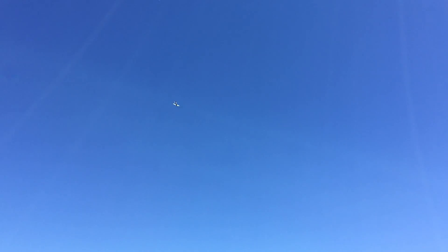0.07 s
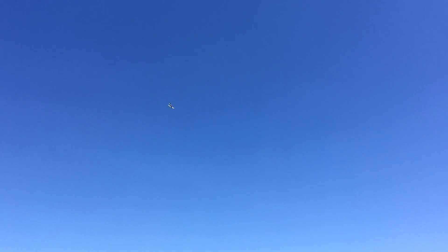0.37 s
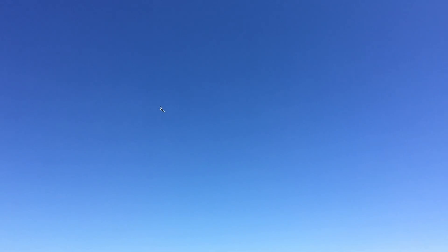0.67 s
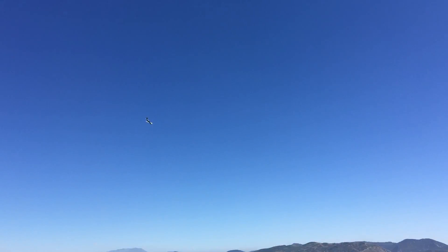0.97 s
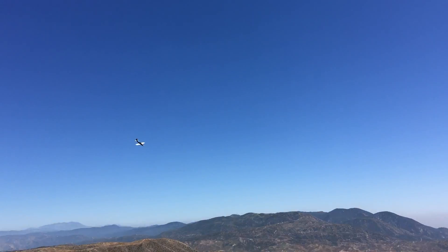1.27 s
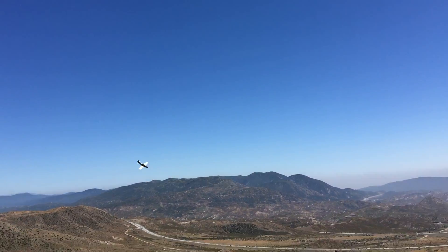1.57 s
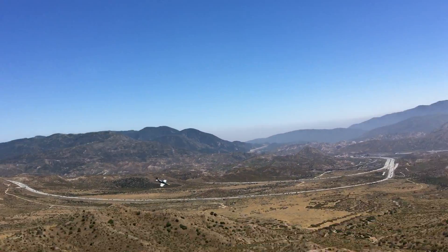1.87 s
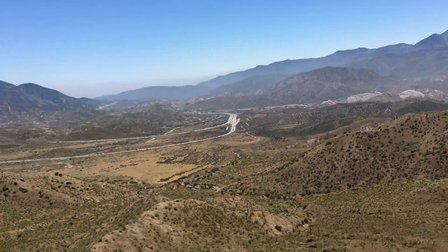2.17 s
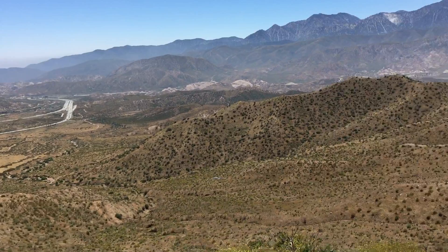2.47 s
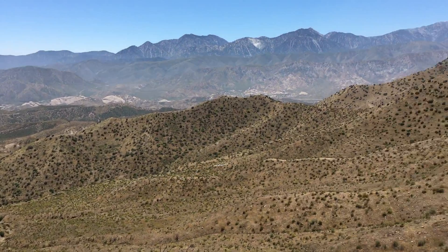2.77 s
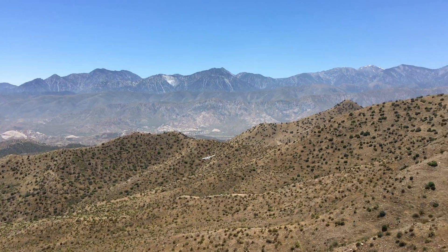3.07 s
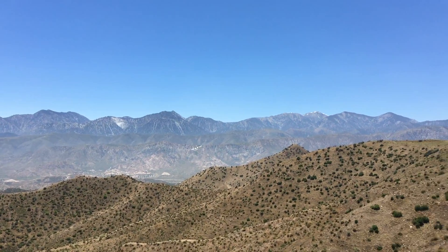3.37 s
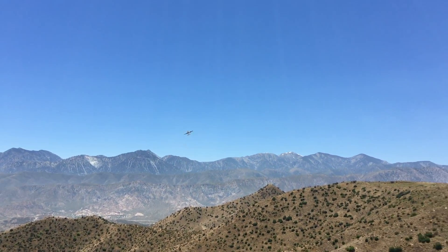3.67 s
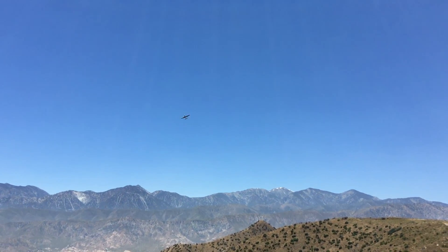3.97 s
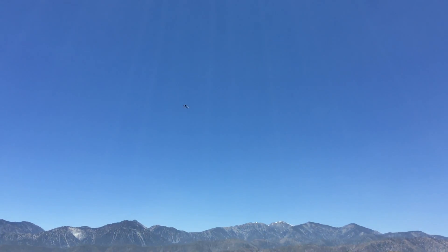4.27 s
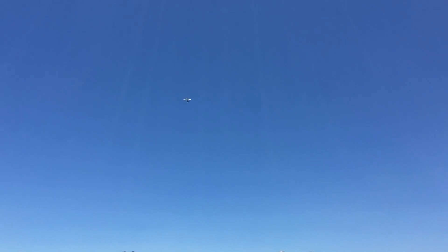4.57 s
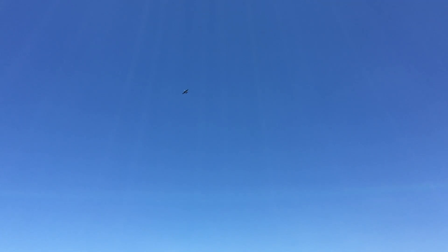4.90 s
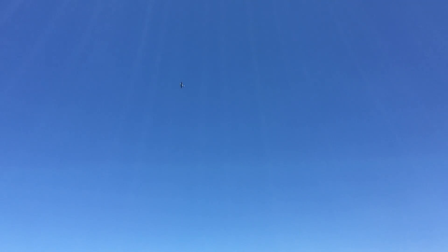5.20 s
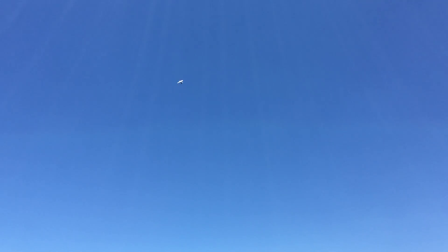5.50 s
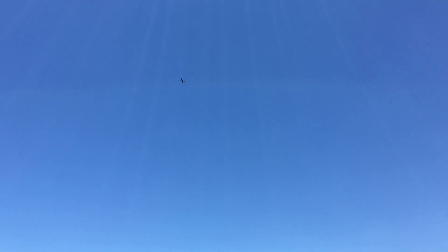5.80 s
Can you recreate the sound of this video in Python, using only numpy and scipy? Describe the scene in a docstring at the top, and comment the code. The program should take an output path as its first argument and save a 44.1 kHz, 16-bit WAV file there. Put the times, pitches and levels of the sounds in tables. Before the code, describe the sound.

Deep, gusty wind buffets the microphone in open hill country. A few faint ticks sound first, then air rushes smoothly over the wings of a passing model glider, swelling and fading. As the microphone turns into the wind, a cluster of thudding, crackling puffs strikes it. A thin, wavering whistle of air across its opening joins in and lasts to the end, with more scattered gusts.

```python
"""On an open hilltop, wind rumbles on a camera microphone while a small model glider rushes past.
The rumble comes from eddies (swirls of air), the rush from air flowing over the glider's wings.
As the camera turns to follow it, the wind meets the microphone's opening, its port, head on:
eddies slap it in rough puffs, and a fluttering whistle, probably from the port's edge, sets in.
A faint hiss lies behind it all, and a few dry ticks are heard at the start."""
import sys
import numpy as np
from scipy import signal
from scipy.fft import rfft, irfft
from scipy.io import wavfile
from scipy.ndimage import uniform_filter1d, minimum_filter1d

SR = 44100
rng = np.random.default_rng(int(sys.argv[2]) if len(sys.argv) > 2 else 0)


def int16_out(signal):
    """Quantize to a 16-bit WAV file."""
    q = np.round(np.clip(np.atleast_2d(signal).T, -1, 1) * 32767)
    wavfile.write(sys.argv[1], SR, q.astype(np.int16))


N = 257544
TIME = np.arange(N) / SR
FREQS = np.fft.rfftfreq(N, 1 / SR)

# The faint background hiss. Each row: time in seconds, level in dB.
AIR_LEVELS = [(0.0, -67.5), (0.8, -69.5), (2.0, -61.5), (2.98, -67.5), (3.25, -86), (4.1, -94), (4.85, -85),
              (5.4, -81.5), (5.84, -78)]
# Small dry ticks. Each row: start in seconds, level in dB.
TICKS = [(0.021, -36), (0.116, -32), (0.148, -37), (0.163, -30), (0.26, -29.5), (0.324, -33), (0.425, -35)]
# Air rushing over the glider's wings. Each row: time in seconds, level in dB.
GLIDER_LEVELS = [(1.25, -52), (1.4, -45), (1.7, -45.5), (2.19, -43), (2.31, -39.5), (2.41, -50),
                 (2.7, -52.5)]
# The wind's strength. Each row: time in seconds, rumble (large eddies) in dB, body (smaller ones) in dB.
WIND_LEVELS = [(0.0, -25, -30.5), (0.28, -22.5, -27), (0.85, -22, -26.5), (1.22, -28.5, -26.5),
               (1.45, -23, -23.5), (1.7, -24, -25.5), (2.05, -26.5, -27), (2.45, -24, -33),
               (2.8, -19.5, -26), (3.15, -21.5, -27.5), (3.5, -22.5, -28), (3.9, -32, -34),
               (4.45, -27, -33.5), (4.75, -21.5, -28.5), (5.1, -27.5, -35), (5.4, -21.5, -28),
               (5.84, -22.5, -31.5)]
# Single gusts. Each row: middle in seconds, length in seconds, extra rumble in dB, extra body in dB.
GUSTS = [(1.073, 0.12, 1, 7.5), (1.675, 0.029, 3, 5), (2.737, 0.055, 5, 10), (2.807, 0.021, 7, 14.5),
         (2.946, 0.01, 7, 10), (3.017, 0.042, 12, 8), (3.439, 0.037, 4, 8.5), (4.121, 0.033, 11, 15),
         (4.219, 0.027, 9, 15), (4.932, 0.028, 11, 14.5), (5.356, 0.03, 0.5, 6), (5.557, 0.047, 5, 6.5)]
# Finely churning air at the port. Each row: time in seconds, level in dB.
FLUTTER_LEVELS = [(0.0, -40.5), (0.4, -35.5), (0.75, -36), (1.3, -41), (2.3, -42), (2.95, -46),
                  (3.35, -47.5), (3.7, -35.5), (4.3, -37.5), (5.84, -39)]
# How squarely the wind meets the turning port. Each row: time in seconds, share from 0 to 1.
FACING = [(0, 0), (2.6, 0.1), (3.1, 0.76), (5.84, 0.85)]
# Eddies that slap the port. Each row: start in seconds, length in seconds, level in dB,
# hardness in dB (more means more treble).
PUFFS = [(1.024, 0.0046, -32.5, -43), (1.036, 0.021, -27.5, -53), (1.062, 0.011, -20, -50.5),
         (1.171, 0.022, -32.5, -41), (1.198, 0.004, -27, -33), (1.668, 0.0041, -21, -55),
         (3.025, 0.0041, -16.5, -41), (3.063, 0.01, -15, -54), (3.08, 0.0036, -6, -31),
         (3.131, 0.017, -18.5, -49), (3.17, 0.017, -15.5, -50), (3.219, 0.0045, -12.5, -41),
         (3.239, 0.0064, -25, -37), (3.265, 0.01, -8, -41), (3.312, 0.0036, -12, -42.5),
         (3.321, 0.014, -15, -54), (3.369, 0.012, -23.5, -66), (3.402, 0.019, -17, -58),
         (3.427, 0.039, -16, -31.5), (3.473, 0.011, -18, -18.5), (3.489, 0.13, -18, -32.5),
         (3.625, 0.038, -16.5, -20.5), (3.665, 0.039, -22, -41), (3.73, 0.023, -21, -40.5),
         (3.799, 0.0047, -21.5, -42), (3.842, 0.0054, -19.5, -46), (3.957, 0.01, -21.5, -39),
         (4.047, 0.026, -20, -39), (4.078, 0.039, -25.5, -29), (4.113, 0.016, -17.5, -21.5),
         (4.129, 0.048, -19.5, -39.5), (4.189, 0.014, -21, -29), (4.205, 0.022, -18.5, -20.5),
         (4.706, 0.018, -22.5, -37.5), (4.79, 0.0086, -24, -47), (4.908, 0.0068, 7, -25.5),
         (4.914, 0.035, -15.5, -34.5), (5.19, 0.0091, -24.5, -62), (5.351, 0.014, -14.5, -40),
         (5.542, 0.005, -14, -30.5)]
# Spells of lesser puffs. Each row: start in seconds, length in seconds, level in dB, hardness in dB.
FLURRIES = [(1.002, 0.12, -33, -42), (2.968, 0.08, -29.5, -56.5), (3.051, 0.17, -22.5, -52)]
# The whistling draught across the port's edge. Each row: time in seconds, level in dB, pitch in Hz.
WHISTLE_CURVE = [(3.65, -38, 2147), (4.2, -38, 1989), (4.36, -34, 2155), (4.8, -33.5, 1963),
                 (4.98, -36.5, 1820), (5.13, -45.5, 1842), (5.21, -31, 1855), (5.5, -31.5, 1887),
                 (5.84, -32, 1794)]
# Hard jolts of wind that make the whistle chirp. Each row: time in seconds, push (1 is a usual push).
JOLTS = [(4.59, 2), (4.66, 3.0), (4.757, 3.3), (4.838, 3.4), (5.023, 3.0), (5.206, 3.2), (5.696, 3.6)]

# A sound's colour is its balance of low and high. Each row: frequency in Hz, level in dB.
AIR_COLOUR = [(1000, -2.5), (3000, 8.5), (6000, 4.5), (7500, 2), (9000, -1), (13000, -1.5), (16000, -4.5)]
TICK_COLOUR = [(100, -12), (400, -4), (900, 10.5), (2500, -3.5), (4000, -12.5), (6500, -22.5), (9000, -44),
               (15000, -44)]
GLIDER_COLOUR = [(300, -20), (900, 6.5), (1600, 1), (2500, -5), (3500, -15), (5000, -29), (6500, -29.5),
                 (9000, -46), (16000, -60.5)]
RUMBLE_COLOUR = [(12, -34.5), (25, -21.5), (40, -10.5), (60, 2), (105, -3.5), (150, -13.5), (300, -34.5),
                 (700, -84.5)]
BODY_COLOUR = [(60, -24), (130, 1.5), (190, -2.5), (290, -6), (420, -14), (700, -30), (1500, -40),
               (4000, -80.5)]
SHELTERED_COLOUR = [(200, -16.5), (450, -2), (620, 4), (850, -4), (1200, -12), (2000, -22.5), (3200, -32),
                    (5000, -49.5), (9000, -64), (16000, -72)]  # flutter with the port out of the wind
FACING_COLOUR = [(200, -19), (450, 3.5), (650, 1), (1000, 2.5), (1500, 0.5), (2200, -12), (3200, -38.5),
                 (5000, -54), (9000, -68), (16000, -68)]  # flutter with the port facing the wind
PUFF_COLOUR = [(60, -10), (200, 3), (350, 0.5), (550, 0.5), (780, -0.5), (1030, 1), (1500, -3), (2200, -10),
               (3000, -18.5), (4200, -30.5), (6000, -41), (9000, -51.5), (15000, -67)]
SPILL_COLOUR = [(700, -7), (1500, -16), (2600, 10.5), (3300, -2.5), (4300, -9.5), (6300, -24.5),
                (8000, -30.5), (14000, -49)]  # the spilling hiss that comes with the whistle
# Narrow bands the microphone hears less well. Each row: centre in Hz, width in Hz, change in dB.
PORT_DIPS = [(4950, 240, -4), (7600, 670, -3.5), (10400, 400, -4)]

USUAL_WHISTLE_DB, USUAL_WHISTLE_HZ = -34, 2010


def gain_of(db):
    """Turns decibels into a number to multiply a sound by."""
    return 10 ** (np.asarray(db) / 20)


def evened(x):
    """Scales a signal so that its average strength (rms) is 1."""
    return x / np.sqrt(np.mean(x ** 2) + 1e-20)


def read_colour(points, hz):
    """Reads between the points of a colour, giving every octave the same room."""
    point_hz, values = np.transpose(points)
    return np.interp(np.log(hz + 1), np.log(point_hz + 1), values)


def follow(rows, column=1):
    """Joins a table's rows with straight lines, giving a value for every sample."""
    rows = np.asarray(rows)
    return np.interp(TIME, rows[:, 0], rows[:, column])


def during(rows, fade_s):
    """Fades in before a table's first time and out after its last."""
    return np.clip(1 + np.minimum(TIME - rows[0][0], rows[-1][0] - TIME) / fade_s, 0, 1)


def coloured(x, colour):
    """Gives a signal a colour, at strength 1."""
    return evened(irfft(rfft(x) * gain_of(read_colour(colour, FREQS)), N))


def wander(hz):
    """A smooth random wobble of strength 1, moving up to about hz times a second."""
    return evened(irfft(rfft(rng.standard_normal(N)) / (1 + (FREQS / hz) ** 4), N))


def steadied(x, span_s):
    """Holds a signal's strength near 1 over any stretch of span_s seconds."""
    window = signal.windows.hann(max(int(span_s * SR), 9))
    power = signal.fftconvolve(x ** 2, window / window.sum(), "same")
    return x / np.sqrt(np.abs(power) + 1e-6)


def add(mix, start_s, sound):
    """Mixes a sound in at its start time."""
    part = mix[max(round(start_s * SR), 0):][:len(sound)]
    part += sound[:len(part)]


def air(level_db=2):
    """A faint, thin hiss behind everything."""
    return gain_of(follow(AIR_LEVELS) + level_db) * coloured(rng.standard_normal(N), AIR_COLOUR)


def ticks(decay_s=0.0012, faint_per_s=130, thinning_s=0.1, faint_db=-39.5, size=512):
    """Dry ticks, each a tiny burst of noise; fainter random ones thin out from the start."""
    out, t = np.zeros(N), np.arange(size) / SR
    faint = rng.random(N) < faint_per_s / SR * np.exp(-TIME / thinning_s)
    levels_db = faint_db + 2 * rng.standard_normal(N)
    for start, db in list(TICKS) + list(zip(TIME[faint], levels_db[faint])):
        tick = evened(rng.standard_normal(size) * np.exp(-t / decay_s))
        add(out, start, gain_of(db) * tick)
    return irfft(rfft(out) * gain_of(read_colour(TICK_COLOUR, FREQS)), N)


def glider(level_db=-1, waver_db=0.5):
    """Air rushes smoothly over the wings, swelling as the glider sweeps by."""
    rush = coloured(rng.standard_normal(N), GLIDER_COLOUR)
    loudness = gain_of(follow(GLIDER_LEVELS) + level_db + waver_db * wander(25))
    return loudness * during(GLIDER_LEVELS, fade_s=0.41) * rush


def eddies(colour, span_s):
    """The changing pressure of passing swirls of air; larger ones sound lower."""
    return steadied(coloured(rng.standard_normal(N), colour), span_s)


def gusts(column):
    """The dB that single gusts add, each rising and falling in a bell shape."""
    return sum(gust[column] * np.exp(-np.minimum(((TIME - gust[0]) / (0.5 * gust[1])) ** 2, 30))
               for gust in GUSTS)


def buffeting(pressure, rumble_db=-0.73, body_db=0.39):
    """Eddies shake the microphone: a deep rumble and a higher body swell together and jump in gusts."""
    swell = wander(14)
    rumble_gain = gain_of(follow(WIND_LEVELS) + gusts(column=2) + rumble_db + 2.5 * swell)
    body_gain = gain_of(follow(WIND_LEVELS, column=2) + gusts(column=3) + body_db + 1.5 * swell)
    return rumble_gain * pressure + body_gain * eddies(BODY_COLOUR, span_s=0.18)


def draught():
    """How strongly air flows across the port's edge, in dB above its usual strength."""
    return follow(WHISTLE_CURVE) - USUAL_WHISTLE_DB


def flutter(pressure, level_db=-0.5, throb_db=2.5, grain_db=3.0):
    """Churning air throbs with the large eddies, lumpier and fuller once the port faces the wind."""
    facing = np.clip(follow(FACING), 0, 1)
    swing_db = throb_db * pressure + (grain_db + 0.5 * facing) * wander(160)
    flow = rng.standard_normal(N) * gain_of(swing_db)
    sound = (1 - facing) * coloured(flow, SHELTERED_COLOUR) + facing * coloured(flow, FACING_COLOUR)
    draught_db = (3.0 + 0.71 * draught()) * during(WHISTLE_CURVE, fade_s=0.1)
    return gain_of(follow(FLUTTER_LEVELS) + level_db + draught_db) * steadied(sound, span_s=0.45)


def flurries(puffs_per_s=85, puff_s=0.005, spread_db=2):
    """Unsettled air brings lesser puffs at uneven steps; lists them as rows like those of PUFFS."""
    rows = []
    for start, length, db, hardness_db in FLURRIES:
        chance = rng.random(size=(64, 2))
        for step, (place, strength) in enumerate(chance[:int(length * puffs_per_s)]):
            puff_db = db + spread_db * (2 * strength - 1)
            rows.append((start + (step + place) / puffs_per_s, puff_s, puff_db, hardness_db))
    return rows


def puffs(level_db=0.5, grain_db=3, crackle_db=5, impact_db=1.5, soft_db=-38, plain_treble_db=-32):
    """Each eddy that hits the port is a burst of rough flow: soft ones thud, hard ones crackle."""
    size, lead_s, ramp_s, impact_s = 8192, 0.01, 0.0011, 0.006
    out, hz, t = np.zeros(N), np.fft.rfftfreq(size, 1 / SR), np.arange(size) / SR
    treble_share = np.clip(read_colour([(2400, 0.11), (5500, 1)], hz), 0, 1)
    bite_shape = read_colour([(220, -0.38), (900, -0.31), (2600, 0.59), (5500, -0.23)], hz)
    landing_db = impact_db * np.exp(-np.maximum(t - lead_s, 0) / impact_s)  # a boost as it lands
    for start, length, db, hardness_db in list(PUFFS) + flurries():
        flow, lumps = rng.standard_normal((2, size))
        lumps = uniform_filter1d(uniform_filter1d(lumps, size=90), size=60)
        lumps = np.clip(evened(lumps), -2, 2)
        gate = np.clip(np.minimum(t - lead_s, lead_s + length - t) / ramp_s + 0.5, 0, 1)
        flow = flow * gate * gain_of(grain_db * lumps + landing_db)
        crackle = evened(flow * gain_of(crackle_db * lumps))
        spectrum = (1 - treble_share) * rfft(evened(flow)) + treble_share * rfft(crackle)
        bite_db = -0.36 + 0.87 * min(hardness_db - soft_db, 0)  # soft puffs lose their bite
        treble_db = (hardness_db - plain_treble_db) * treble_share
        colour_db = read_colour(PUFF_COLOUR, hz) + bite_db * bite_shape + treble_db
        burst = evened(irfft(spectrum * gain_of(colour_db))) * np.sqrt(length * SR / size)
        add(out, start - lead_s, gain_of(db + level_db) * burst)
    return out


def wind_push(pressure, lesser_per_s=5, lesser_push=2.4, jolt_s=0.0013):
    """The wind's restless push on the port's edge, with hard jolts and lesser ones at random."""
    push = 0.95 * np.clip(steadied(pressure + 0.95 * wander(139.2), span_s=0.17), -2, 2)
    random_times = TIME[rng.random(N) < lesser_per_s / SR]
    lesser = [(when, lesser_push) for when in random_times if when > WHISTLE_CURVE[0][0]]
    for when, strength in lesser + list(JOLTS):
        push += (strength - push) * np.exp(-np.minimum(((TIME - when) / jolt_s) ** 2, 20))
    return push


def whistle(pressure, level_db=1, bend=0.073, jitter=0.0457, lag_s=0.004, throb_db=6, spill_db=-53.5):
    """Air crossing an edge sings and hisses: each push makes both louder, then lifts the pitch."""
    push = wind_push(pressure)
    late_push = np.interp(TIME - lag_s, TIME, push)
    pitch = follow(WHISTLE_CURVE, column=2)
    hz = pitch * (1 + bend * late_push + jitter * wander(399))
    tone = np.sin(2 * np.pi * np.cumsum(hz) / SR) * gain_of(throb_db * push + 3.3 * wander(220))
    tone = gain_of(follow(WHISTLE_CURVE) + level_db) * steadied(tone, span_s=0.1)
    hiss = coloured(rng.standard_normal(N) * gain_of(5.5 * push + 2 * wander(250)), SPILL_COLOUR)
    # The hiss grows faster than the tone, and is louder when the pitch is higher.
    hiss_db = spill_db + 1.4 * draught() + 0.04 * (pitch - USUAL_WHISTLE_HZ)
    return (tone + gain_of(hiss_db) * hiss) * during(WHISTLE_CURVE, fade_s=0.069)


def scene():
    """Adds up all the sounds; the same large eddies make the rumble and shake flutter and whistle."""
    pressure = eddies(RUMBLE_COLOUR, span_s=0.16)
    wind = buffeting(pressure) + flutter(pressure) + whistle(pressure)
    return (wind + glider() + air() + puffs() + ticks())[None]


def record(dry, ceiling=0.64, top_hz=15850):
    """A limiter briefly turns down loud slaps; the port dulls a few bands and the top treble is cut."""
    allowed_gain = np.minimum(1, ceiling / (np.abs(dry[0]) + 1e-9))
    held_gain = minimum_filter1d(allowed_gain, size=161)
    smooth_gain = uniform_filter1d(uniform_filter1d(held_gain, size=81), size=81)
    limited = dry[0] * smooth_gain * signal.windows.tukey(N, 0.001)  # tiny fades at both ends
    hz = np.fft.rfftfreq(1024, 1 / SR)
    dips_db = sum(db * np.exp(-((hz - centre) / width) ** 2) for centre, width, db in PORT_DIPS)
    heard = signal.oaconvolve(limited, signal.firwin2(511, hz, gain_of(dips_db), fs=SR), "same")
    treble_cut = signal.firwin(511, top_hz, window=("kaiser", 9), fs=SR)
    return signal.oaconvolve(heard, treble_cut, "same")[None]


dry = scene()
out = record(dry)
int16_out(out)
```